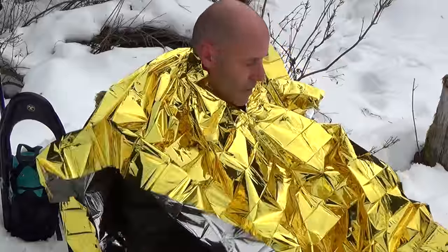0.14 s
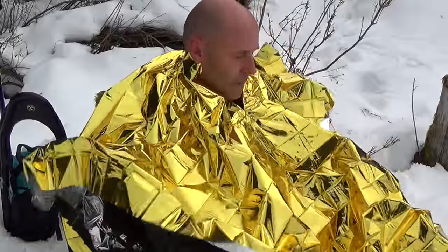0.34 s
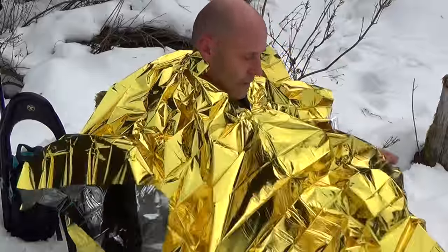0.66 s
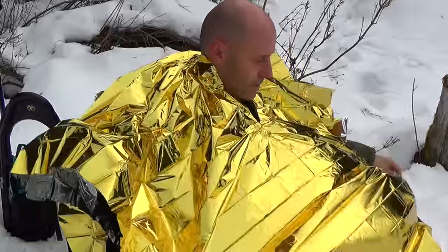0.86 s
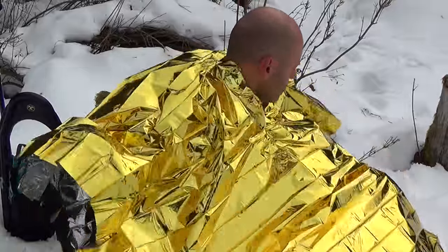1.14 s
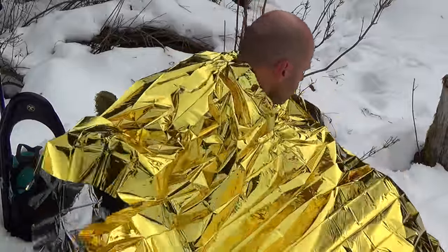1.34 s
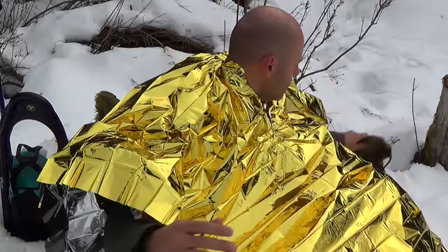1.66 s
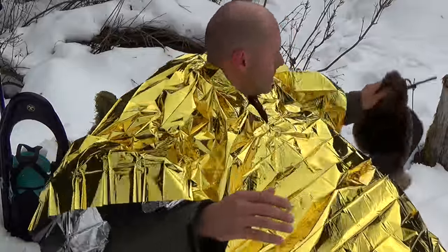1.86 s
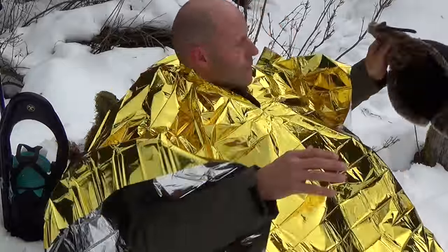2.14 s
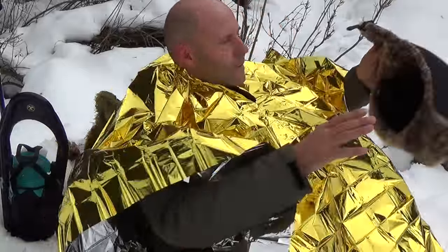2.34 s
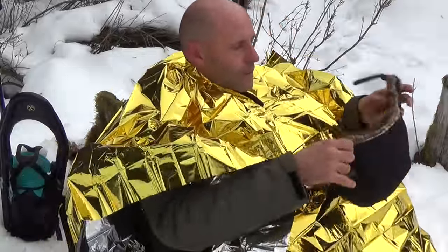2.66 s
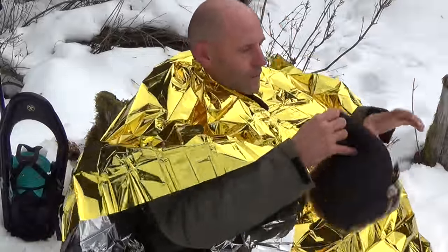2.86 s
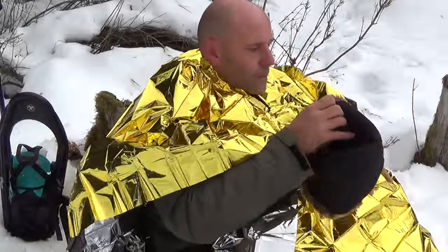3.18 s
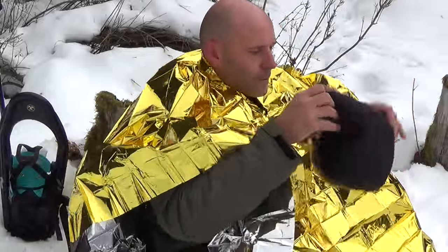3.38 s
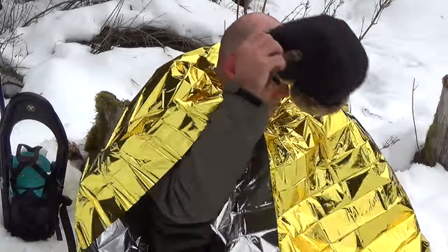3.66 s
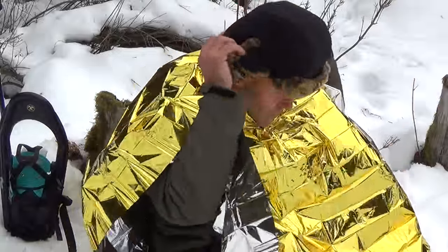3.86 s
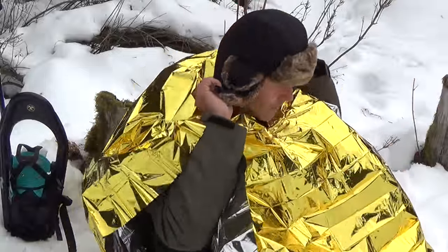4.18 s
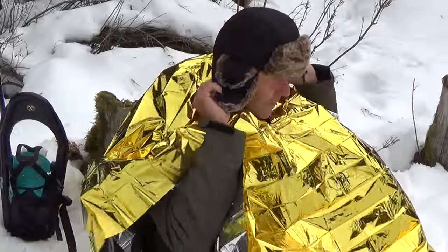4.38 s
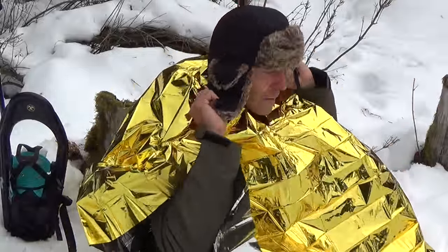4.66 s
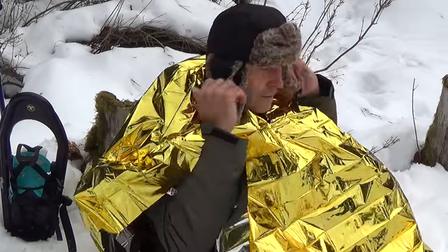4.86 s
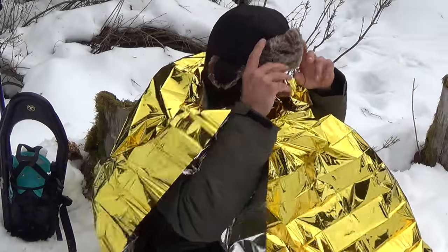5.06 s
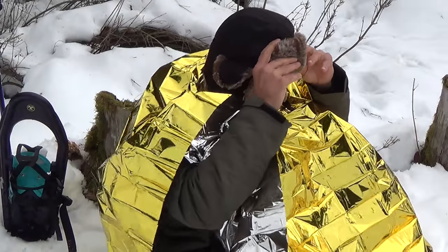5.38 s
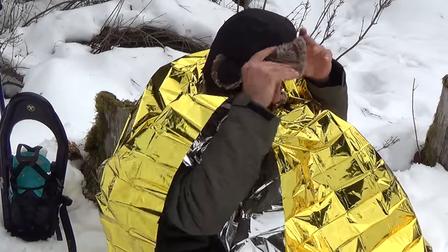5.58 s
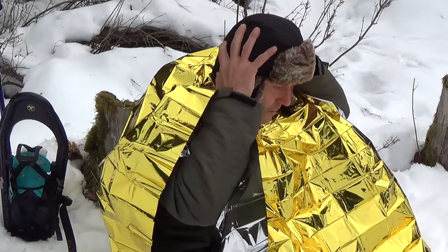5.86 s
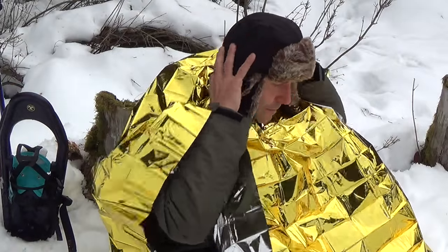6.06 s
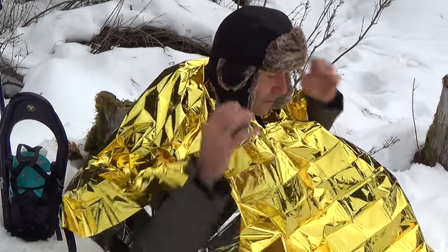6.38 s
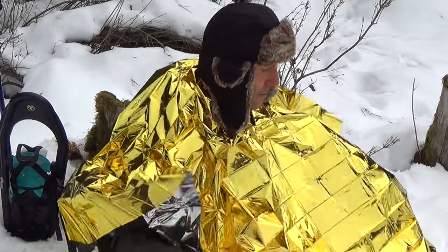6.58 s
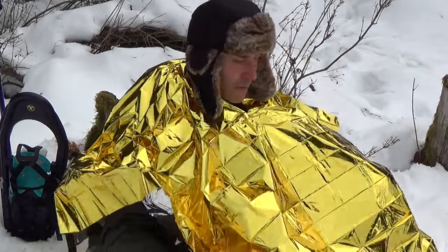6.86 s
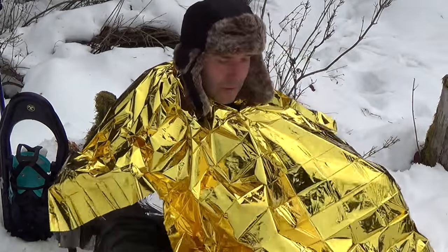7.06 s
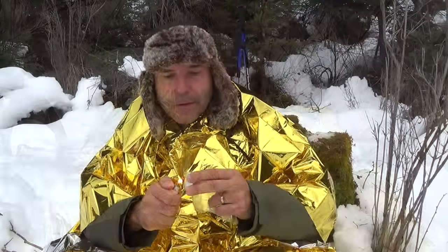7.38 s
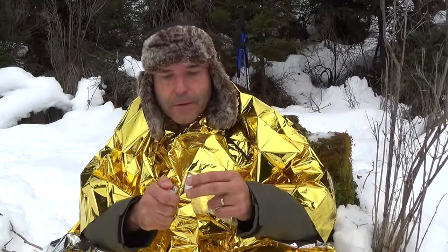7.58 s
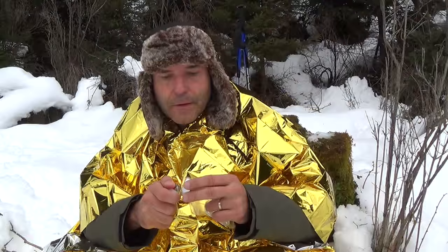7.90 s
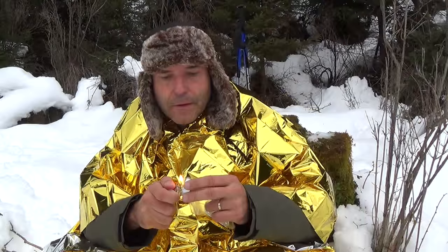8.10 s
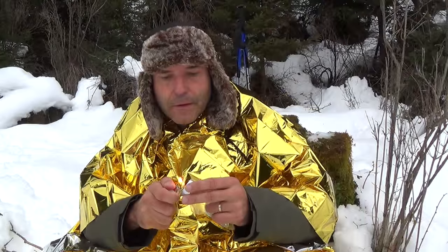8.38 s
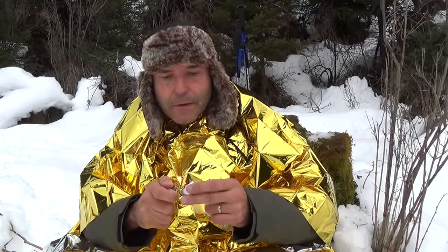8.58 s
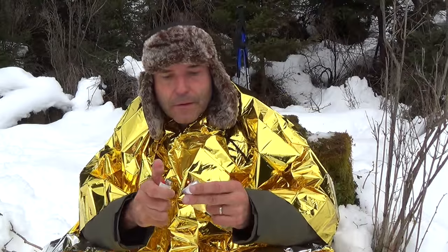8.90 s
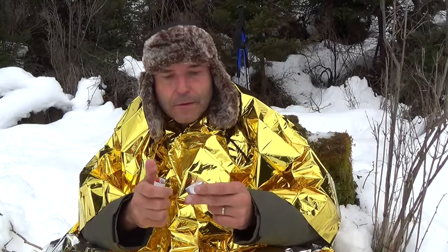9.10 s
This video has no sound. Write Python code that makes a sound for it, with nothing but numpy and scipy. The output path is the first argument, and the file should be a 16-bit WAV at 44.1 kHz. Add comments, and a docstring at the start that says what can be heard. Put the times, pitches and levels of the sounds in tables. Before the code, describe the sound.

Loud, crisp crinkling of metallised foil outdoors, with soft swishes and sharp snaps, suddenly gives way to quiet isolated clicks in still, hissy air.

```python
"""A thin metallised foil blanket is pulled and wrapped round a seated body in a snowy wood, close by.
First thousands of creases snap through (ticks with noise rattles) over panel swish, dull bumps and flaps.
From about 7.5 s the wearer sits nearly still, further off: single snaps stand out.
Throughout lie quiet air and circuit hiss (filtered noise) and a faint high whine (a sine)."""
import sys
import numpy as np
from scipy import signal
from scipy.fft import rfft, irfft
from scipy.io import wavfile

SR = 44100
rng = np.random.default_rng(int(sys.argv[2]) if len(sys.argv) > 2 else 0)


def to_wav(s):
    """Save 16-bit WAV."""
    ch = np.atleast_2d(s).T  # columns
    pcm = np.round(np.clip(ch, -1, 1) * 32767)  # PCM
    wavfile.write(sys.argv[1], SR, pcm.astype(np.int16))


N = 407467


def gain_of(db):
    """Decibels to an amplitude factor."""
    return 10 ** (np.asarray(db) / 20)


def evened(x):
    """Scales to rms 1."""
    return x / np.sqrt(np.mean(x ** 2) + 1e-20)


def add(mix, start_s, sound):
    """Mixes a sound in at start_s."""
    part = mix[round(start_s * SR):][:len(sound)]
    part += sound[:len(part)]


def gain_db_at(hz, points):
    """Reads a (freq_hz, gain_db) table along log frequency."""
    freq_hz, gain_db = np.transpose(points)
    return np.interp(np.log(hz + 1), np.log(freq_hz + 1), gain_db)


def colour(x, points):
    """Minimum-phase filter of the tabled gain: causal, so clicks keep their sharp front."""
    hz = abs(np.fft.fftfreq(4096, 1 / SR))
    log_gain = np.log(gain_of(np.maximum(gain_db_at(hz, points), -100)))
    spectrum = np.exp(np.conj(signal.hilbert(log_gain)))
    taps = np.fft.ifft(spectrum).real[:2048]
    return signal.oaconvolve(x, taps)[:len(x)]


def even_taps(points):
    """Taps of a symmetric filter of the tabled gain: no phase shift once centred."""
    hz = np.fft.rfftfreq(512, 1 / SR)
    return np.roll(irfft(gain_of(gain_db_at(hz, points))), 255)[:511]


def wander(top_hz):
    """Low-passed noise of rms 1; its gain is halved at top_hz."""
    spectrum = rfft(rng.standard_normal(N))
    hz = np.fft.rfftfreq(N, 1 / SR)
    return evened(irfft(spectrum / (1 + (hz / top_hz) ** 2), N))


# how hard the foil is moved: time_s, crackle_level_db
MOTION = [(0.0, -17), (0.25, -22.5), (0.28, -15), (0.5, -17.5), (0.83, -14), (1.15, -16), (1.27, -20),
          (1.445, -20.5), (1.47, -25.5), (1.69, -29.5), (1.8, -21.5), (2.22, -17.5), (2.53, -21.5),
          (2.58, -27), (3.09, -28.5), (3.32, -30.5), (3.6, -22), (3.8, -21), (3.95, -23), (4.06, -30),
          (4.18, -26), (4.23, -24.5), (4.44, -22), (4.52, -25.5), (4.92, -25), (5.04, -18.5), (5.39, -30.5),
          (5.56, -34), (5.83, -20.5), (6.0, -30), (6.18, -19.5), (6.31, -21), (6.52, -13.5), (6.62, -15.5),
          (6.77, -22.5), (6.83, -18.5), (7.0, -16.5), (7.11, -22.5), (7.3, -23), (7.5, -40), (7.6, -49),
          (7.8, -46), (8.18, -57), (8.4, -65), (8.7, -51.5), (9.24, -46)]
# sudden tugs that raise the crackle, then die away: start_s, rise_db (0 adds nothing), dying_s
TUGS = [(0.116, 2.5, 0.12), (.256, 9, 0.017), (3.111, 9.5, 0.17), (3.44, 2.5, 0.064), (3.53, 2.5, 0.058),
        (4.72, 1.5, 0.24), (5.465, 2.5, 0.042), (5.575, 2, 0.024), (5.89, 4.5, 0.027), (7.13, 0, 0.026),
        (7.588, 23, 0.0085), (8.632, 12, 0.01), (8.724, 9, 0.03), (8.798, 7, 0.01), (8.94, 9.5, 0.046)]


def motion_level():
    """Crackle level in dB: the motion plus tugs that jump up and die away exponentially."""
    t = np.arange(N) / SR
    level_db = np.interp(t, *np.transpose(MOTION))
    for start_s, rise_db, dying_s in TUGS:
        level_db = level_db + rise_db * (t > start_s) * np.exp(-abs(t - start_s) / dying_s)
    return level_db


def crease(ticks, noise, hz, t60_s, rattle_db, favour_db=6.5, spread=0.63):
    """Creases flip: a tick, then a brief rattle of neighbours; facet size favours a band round hz."""
    fade = 10 ** (-6 / (t60_s * SR))  # power left after one sample
    power = abs(signal.lfilter([1], [1, -fade], ticks ** 2))
    rattle = gain_of(rattle_db) * noise * np.sqrt(power)
    wide = (1 + spread) ** 2
    return colour(ticks + rattle, [(hz / wide, -favour_db), (hz, 0), (hz * wide, -favour_db)])


# crackle as the microphone colours it: freq_hz, gain_db
FOIL = [(180, -48), (300, -17.5), (1040, -14), (2000, -7), (4440, -3.5), (5790, -8.5), (6940, -2.5),
        (8600, -2.5), (9980, 1.5), (11400, -3), (14400, -15), (15600, -20.5)]
FULL_MOTION_DB = -15
LULL_CLUMP_PER_DB = 0.029  # clumping deepens by this share per dB below full motion, up to 20 dB


def crackle(level_db, loud_per_s=9000., per_db=0.79, size_db=2.5, clump_db=0.74, count=8):
    """Random creases; harder motion gives more of them, in clumps. Returns mid and side."""
    rate_per_s = np.clip(loud_per_s * gain_of(per_db * (level_db + 16.0)), 250, SR / 2)
    lull_db = np.clip(FULL_MOTION_DB - level_db, 0, 20)
    wander_db = clump_db * wander(18.0) + 0.95 * wander(95.0)
    clumps = gain_of(wander_db * (1 + LULL_CLUMP_PER_DB * lull_db))
    size = gain_of(size_db * np.minimum(rng.exponential(1, N), 6.)) * rng.choice([-1., 1.], N)
    happens = rng.random(N) < rate_per_s / SR
    train = size * happens * clumps / np.sqrt(rate_per_s)  # the root keeps power free of rate
    facet = rng.integers(0, count, N)
    out = np.zeros((2, N))
    for k, hz in enumerate(np.geomspace(700., 16000., count)):
        noise = rng.standard_normal(N)
        sound = crease(train * (facet == k), noise, hz, t60_s=0.013, rattle_db=-13.5)
        out += sound * np.array([[1], [(-1) ** k]])  # facets alternate in sign in the side signal
    return [evened(colour(x, FOIL)) * gain_of(level_db) for x in out]


# clearest single creases, each ticking 1 ms after start_s:
# start_s, peak_db, favoured_hz, rattle_db (behind the tick)
SNAPS = [(1.118, -4, 9630, -15), (1.369, -3, 9450, -15), (1.411, -5, 8090, -13), (1.491, -7.5, 10100, -15),
         (1.505, -6.5, 9320, -14), (1.528, -9, 10600, -11), (1.564, -4.5, 9330, -16),
         (1.683, -15, 10700, -10), (2.555, -7, 10700, -13), (2.683, -11, 8300, -13),
         (2.774, -14, 10500, -13), (2.903, -8.5, 10100, -14), (2.932, -2.5, 8660, -18),
         (3.011, -13, 10800, -13), (3.021, -13, 8550, -13), (3.07, -13, 9820, -15), (3.11, -9, 9740, -18),
         (3.381, -4, 10200, -1), (3.485, -6, 9220, -13), (4.073, -10.5, 10100, -13),
         (4.083, -12, 11400, -13), (4.639, -5.5, 9320, -12), (5.097, -11, 9140, -13.5),
         (5.126, -6, 9790, -20), (5.188, -10, 9970, -15), (5.313, -13, 10100, -10), (5.339, -14, 7050, -13),
         (5.35, -13, 9620, -13), (5.465, -16, 7910, -13), (5.473, -21, 9510, -17), (5.568, -14, 10500, -10),
         (5.589, -12, 10500, -12), (5.691, -10, 10300, -13), (5.708, -6, 11000, -12),
         (5.881, -14, 10200, -13), (5.948, -17, 10100, -13), (5.991, -10, 10500, -13),
         (6.264, -5, 9810, -10), (6.29, -7, 9970, -13), (6.864, -3, 9530, -15.5), (6.935, -6, 9350, -15),
         (7.223, -6, 9370, -17), (7.317, -12, 8820, -15), (7.513, -24, 9310, -13), (7.551, -22, 9320, -13),
         (7.586, -13.5, 7590, -17), (7.661, -17, 9580, -13), (7.685, -31, 7520, -13),
         (7.725, -32, 7150, -27), (7.794, -36, 7540, -13), (7.808, -24, 3230, -18),
         (7.825, -19, 11200, -11), (7.846, -24, 9280, -13), (7.863, -26, 10200, -13),
         (7.875, -22, 7220, -10), (7.897, -27, 10600, -13), (7.905, -32, 10700, -13),
         (7.915, -25, 9750, -13), (7.976, -21, 9560, -9), (8.034, -21.5, 10100, -9),
         (8.092, -36, 2500, -13), (8.154, -25, 8590, -14), (8.174, -26, 10400, -13),
         (8.232, -28, 8980, -13), (8.305, -32, 4290, -10), (8.386, -31, 10500, -13),
         (8.401, -30, 4520, -13), (8.412, -20.5, 6890, -13), (8.422, -27, 4160, -10),
         (8.458, -26, 8180, -13), (8.611, -30, 10600, -13), (8.632, -23.5, 9390, -11),
         (8.667, -19.5, 9750, -13), (8.689, -26, 4140, -11), (8.804, -21, 9360, -12),
         (8.82, -27, 9570, -14), (8.842, -30, 10200, -13), (8.871, -28, 9560, -13),
         (8.907, -27, 10600, -13), (8.935, -28, 9650, -15), (9.028, -27, 8880, -17),
         (9.143, -24, 9360, -14), (9.182, -25, 10700, -13), (9.209, -24, 11000, -13)]
TICK_DELAY_S = .001


def snaps():
    """Single creases: a unit tick and its rattle, each scaled to its peak."""
    out = np.zeros(N)
    tick = signal.unit_impulse(2048)
    for start_s, peak_db, favoured_hz, rattle_db in SNAPS:
        noise = rng.standard_normal(len(tick))
        snap = crease(tick, noise, favoured_hz, t60_s=0.016, rattle_db=rattle_db, favour_db=4.5)
        snap = colour(snap, FOIL)
        add(out, start_s + TICK_DELAY_S, gain_of(peak_db) * snap / abs(snap).max())
    return out


# freq_hz, gain_db
SWISH = [(18, -48), (50, -15), (110, -12.5), (290, -4.5), (1040, -2), (1600, -3.5), (2600, -27.5)]
SWISH_DB, SWISH_PER_DB = -38, .55  # level at full motion; dB gained per dB of crackle
SITS_STILL_S, FAR_SWISH_DB = 7.45, -3.5  # weaker from further off


def swish(level_db):
    """Whole panels swish: low noise that grows more slowly than the crackle. Returns mid and side."""
    t = np.arange(N) / SR
    noise = np.array([evened(colour(x, SWISH)) for x in rng.standard_normal((2, N))])
    swish_db = SWISH_DB + SWISH_PER_DB * (level_db - FULL_MOTION_DB)
    swish_db = swish_db + FAR_SWISH_DB * (t > SITS_STILL_S) + 2.7 * wander(27.0)
    return noise * gain_of(swish_db)


# side filter: freq_hz, side_minus_mid_db
WIDTH = [(60, -33), (150, -46), (380, -12.5), (950, -88), (2380, -39), (5980, -40), (15000, -61)]
# how far right the moving foil lies, as mid taken into the side: time_s, lean_db
LEAN = [(0, -33), (.5, -25.5), (.95, -22.5), (1.15, -59), (2.3, -62), (2.7, -27), (3.15, -17), (3.6, -45),
        (5.0, -63), (5.4, -18), (6.3, -77), (7.1, -21), (7.5, -30), (9.24, -28)]
# freq_hz, gain_db
LEAN_COLOUR = [(300, 0), (1000, -27), (2400, 16), (4400, -37), (9500, 3.5), (13000, -21)]


def foil():
    """Crackle and swish follow the motion, single snaps lie on top; all lean right by turns."""
    t = np.arange(N) / SR
    level_db = motion_level()
    crackle_mid, crackle_side = crackle(level_db)
    swish_mid, swish_side = swish(level_db)
    mid = crackle_mid + snaps() + swish_mid
    lean_gain = gain_of(np.interp(t, *np.transpose(LEAN)))
    lean = signal.oaconvolve(mid, even_taps(LEAN_COLOUR), "same") * lean_gain
    return np.array([mid, colour(crackle_side + swish_side, WIDTH) - lean])


# short broad puffs and thumps, one of them the body of a snap:
# start_s, level_db, pitch_hz, t60_s, ring_share (0-1)
BUMPS = [(3.1115, -17.5, 900, 0.015, 0), (7.808, -22, 1750, 0.008, 0), (7.951, -40, 300, 0.022, 0.1),
         (8.486, -41, 342, 0.061, 0.8)]


def bumps():
    """Dull, quickly damped thumps: a broad noise puff, a few with a short sine ring."""
    t, out = np.arange(4096) / SR, np.zeros(N)
    for start_s, level_db, pitch_hz, t60_s, ring in BUMPS:
        band = [(pitch_hz / 9.9, -30.), (pitch_hz / 2, 0), (pitch_hz * 2, 0), (pitch_hz * 10.4, -30.)]
        puff = evened(colour(rng.standard_normal(len(t)), band))
        body = ring * np.sin(2 * np.pi * pitch_hz * t) + (1 - ring) * puff
        onset = 1 - np.exp(-t / 0.00028)
        add(out, start_s, gain_of(level_db - 60 * t / t60_s) * body * onset)
    return out


# a whole panel flaps and pushes low air: middle_s, peak_db, half_length_s
FLAPS = [(1.44, -49, 0.018), (4.99, -47, 0.056), (5.877, -44, .03), (6.902, -35.5, 0.047),
         (6.984, -36.5, .04), (7.195, -40, 0.021), (7.295, -38.5, 0.041)]
# freq_hz, gain_db
FLAP = [(30, -23), (80, -11), (240, 1), (600, -2.5), (1200, -4), (2500, -49)]


def flaps():
    """Soft bell-shaped swells of low noise."""
    t = np.arange(N) / SR
    swell = sum(gain_of(peak_db) * np.exp(-((t - middle_s) / half_s) ** 2)
                for middle_s, peak_db, half_s in FLAPS)
    return swell * evened(colour(rng.standard_normal(N), FLAP))


# freq_hz, gain_db
AIR = [(15, -25), (30, -1), (120, 1), (490, -1), (2500, -2), (4200, -3), (5800, -7), (10000, -4),
       (14000, -14), (15600, -11)]
# side filter: freq_hz, side_minus_mid_db
AIR_WIDTH = [(60, -18), (240, -2.5), (950, 2), (3770, -13.5), (15000, -19)]
AIR_DB = -53.5
WHINE_HZ, WHINE_DB = 15625, -67  # rms level, before its slow wander


def background():
    """Still winter air and circuit hiss as steady noise, with a thin electronic whine."""
    mid, side = (gain_of(AIR_DB) * evened(colour(x, AIR)) for x in rng.standard_normal((2, N)))
    whine_gain = np.sqrt(2) * gain_of(WHINE_DB + 1.5 * wander(3.))
    whine = whine_gain * np.sin(2 * np.pi * WHINE_HZ * np.arange(N) / SR)
    return np.array([mid + whine, colour(side, AIR_WIDTH)])


def scene():
    """Nearly mono, with a narrow side signal."""
    mid, side = foil() + background()
    mid = mid + bumps() + flaps()
    return np.array([mid + side, mid - side])


EDGE_HZ = 15880


def record(dry):
    """The input stage rounds off the tallest peaks; a low-pass then limits the band."""
    rounded = dry / (1 + abs(dry) ** 4) ** .25
    low_pass = signal.firwin(511, EDGE_HZ, window=("kaiser", 9), fs=SR)
    return signal.oaconvolve(rounded, low_pass[None], "same")


dry = scene()
out = record(dry)
to_wav(out)
```